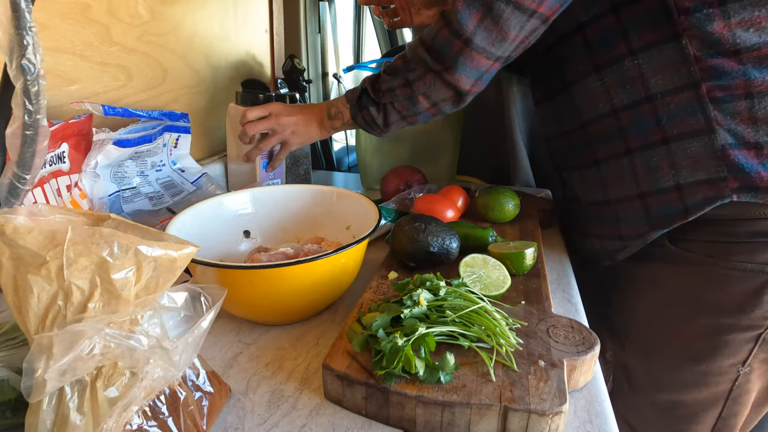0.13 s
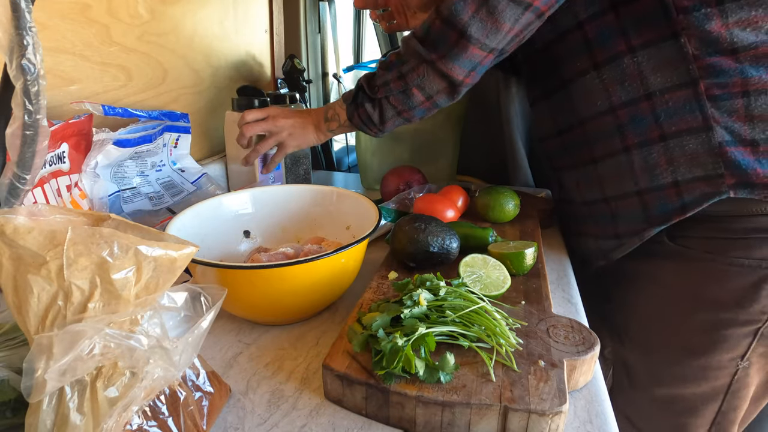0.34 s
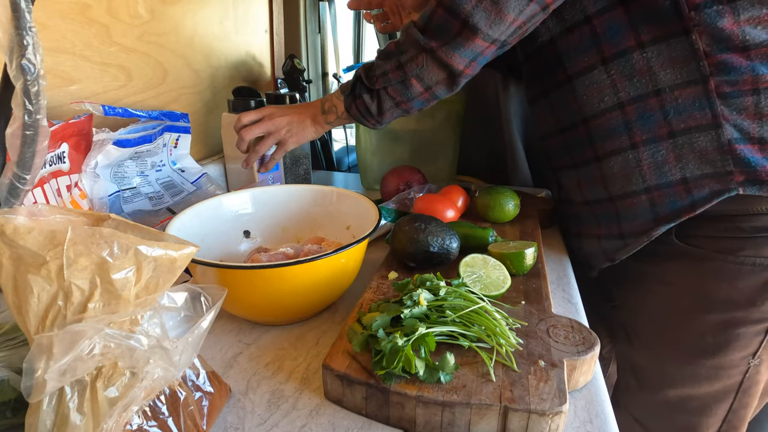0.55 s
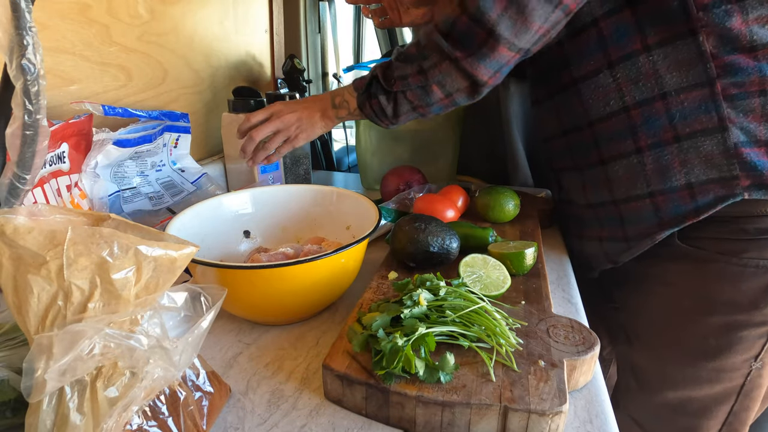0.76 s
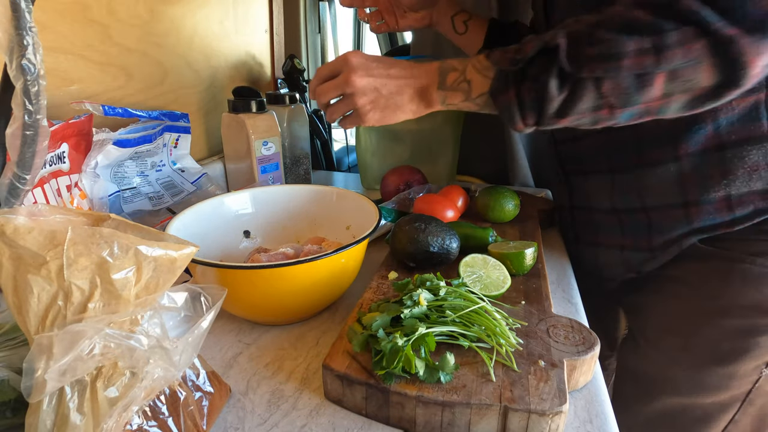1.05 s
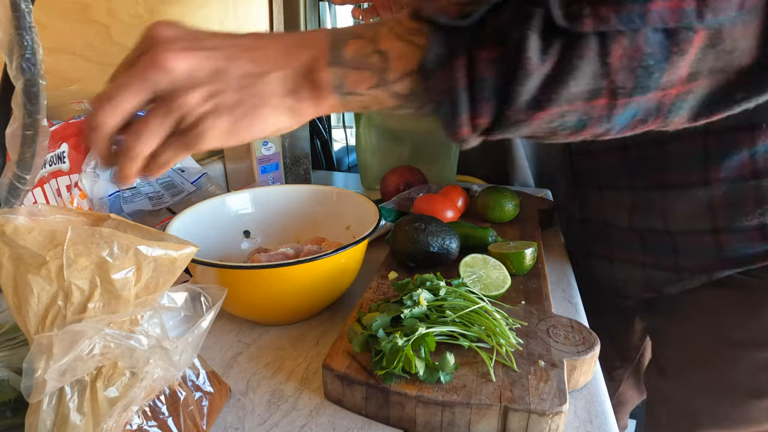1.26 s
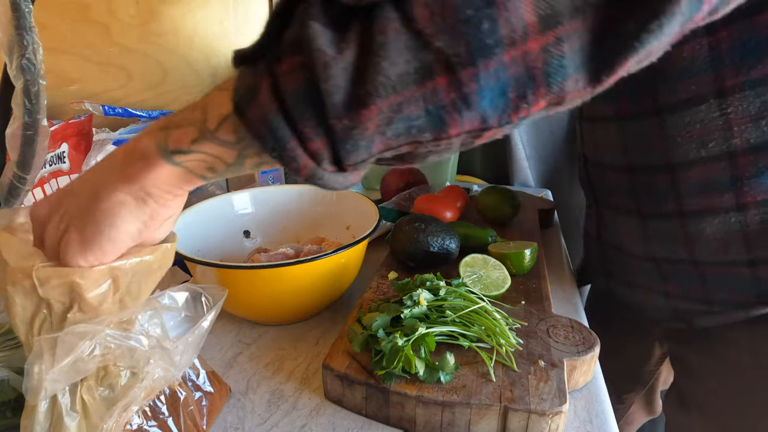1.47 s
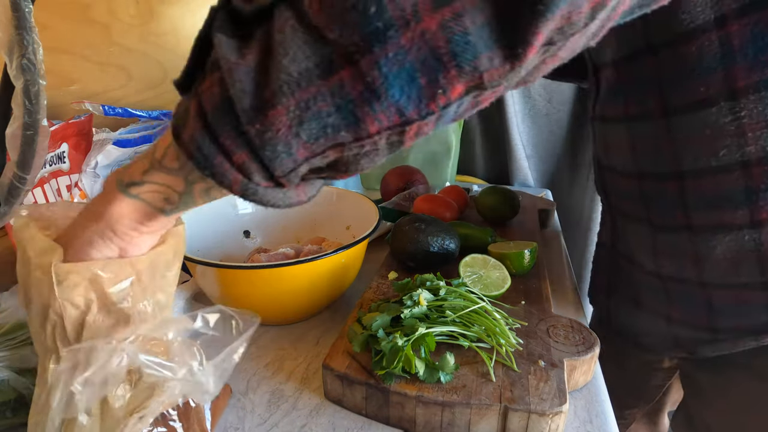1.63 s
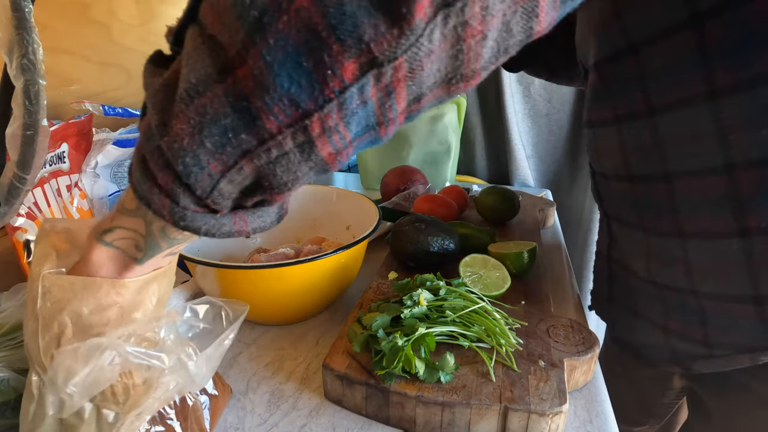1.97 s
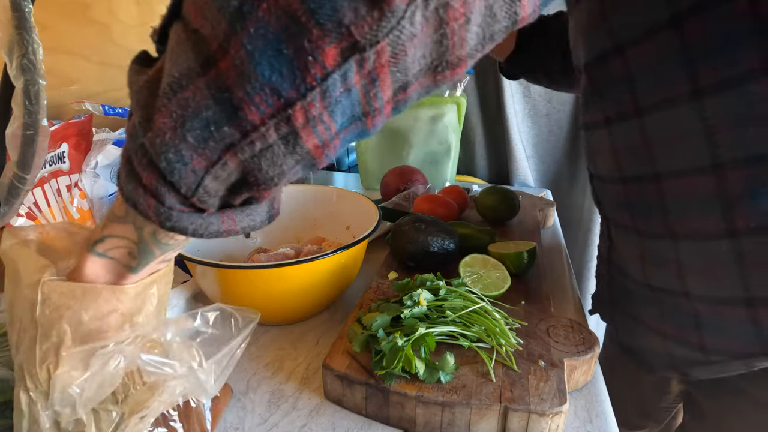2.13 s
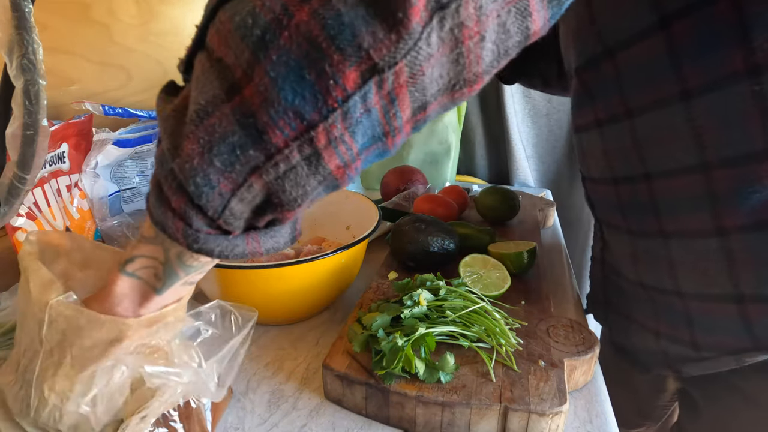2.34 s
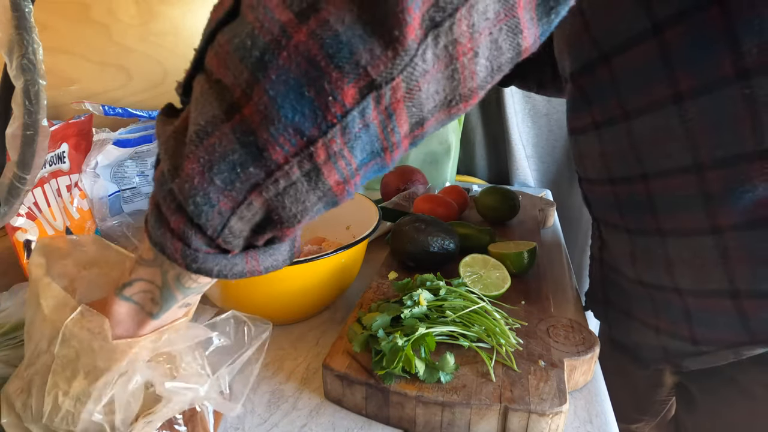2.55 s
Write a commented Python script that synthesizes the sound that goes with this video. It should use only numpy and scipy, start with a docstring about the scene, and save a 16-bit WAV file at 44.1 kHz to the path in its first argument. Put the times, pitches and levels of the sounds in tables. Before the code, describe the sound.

The main sound is a paper bag with a plastic liner crinkling close by. First, from 0.2 to 0.6 seconds, a carton lands on a hollow counter with a juddering low thump and light finger ticks. A soft bump follows near 1.2 seconds. From 1.4 seconds a hand rummages in the bag, slightly left, with sharp crackles, loudest from 1.7 to 2.4, easing by 2.7. Faint hiss lies underneath.

```python
"""First a carton is set down on a hollow kitchen counter. It judders as it sticks and slips, the counter
rings with a low thump, and fingers tick on the carton as they let go. From about 1.4 s a hand digs into
a paper bag with a plastic liner, close by and a little to the left: creases buckle in swarms of tiny
snaps and the panels flap. The small room answers briefly, and a faint hiss lies under it all."""
import sys
import numpy as np
from scipy import signal
from scipy.fft import rfft, irfft
from scipy.io import wavfile
from scipy.ndimage import uniform_filter1d

SR = 44100
rng = np.random.default_rng(int(sys.argv[2]) if len(sys.argv) > 2 else 0)


def wrap_up_sound(samples):
    """Save the sound to the file named by the first command line argument, as 16-bit audio."""
    columns = np.atleast_2d(samples).T
    # keep every value between -1 and 1, then stretch to whole-number steps
    tamed = np.clip(columns, -1, 1)
    steps = np.round(tamed * 32767).astype(np.int16)
    wavfile.write(sys.argv[1], SR, steps)


N = 119070
TIME = np.arange(N) / SR
HZ = np.fft.rfftfreq(4096, 1 / SR)
TOUCH_S = 1.409  # the hand meets the bag
WIDTH_DB = 3.5  # spread of the level difference between the ears

# how strongly the hand stirs each part of the bag: t/s, paper/dB, liner/dB, panels/dB
HAND_MOTION = [(1.405, -64, -63, -53), (1.418, -53, -48, -56), (1.459, -44, -39.5, -51.5),
               (1.478, -39.5, -32.5, -55), (1.523, -42, -38.5, -54), (1.705, -30, -31, -43.5),
               (1.725, -33.5, -34, -47.5), (1.815, -38, -37, -50), (1.877, -28, -32, -38.5),
               (1.941, -38.5, -38.5, -46.5), (1.963, -38.5, -45, -62), (1.981, -40, -41, -53),
               (2.017, -26, -32.5, -45), (2.027, -26.5, -30, -38), (2.063, -35, -34, -48.5),
               (2.089, -29.5, -31, -42), (2.099, -30.5, -32, -45), (2.161, -43.5, -43.5, -61.5),
               (2.187, -42, -48.5, -55), (2.201, -47, -44, -48.5), (2.215, -38, -46, -45),
               (2.223, -30.5, -37.5, -45), (2.238, -34.5, -38.5, -47.5), (2.258, -35.5, -40.5, -45),
               (2.287, -28.5, -33.5, -42.5), (2.301, -28, -29, -37), (2.333, -34.5, -36, -45),
               (2.367, -30, -31.5, -46.5), (2.385, -28, -31, -40), (2.435, -37.5, -40.5, -46.5),
               (2.449, -37, -44, -49), (2.51, -44, -44, -52.5), (2.589, -41, -39.5, -58),
               (2.615, -49.5, -44.5, -60), (2.661, -43.5, -44.5, -53.5), (2.7, -50.5, -42.5, -62)]
# where the counter is heard: f/Hz, left minus right/dB
COUNTER_BALANCE = [(30, -4.5), (100, -3), (160, -5), (250, -2), (450, 1.5)]


def bag():
    """A hand makes the paper crackle, the liner fizz, the panels flap and single creases snap."""
    # tone of the paper, the liner and the panels: f/Hz, level/dB
    paper = [(100, -47), (300, -36), (780, -19), (1050, -0.5), (1220, -7), (1520, 1), (1800, -4),
             (2200, -1), (2800, -2.5), (3500, -4.5), (5000, -17.5), (9000, -67)]
    liner = [(150, -61), (1500, -12), (3000, -8), (3800, -6), (4700, -3.5), (6200, -1.5), (7500, -3),
             (8700, -9), (10500, -12.5), (12200, -16), (13200, -24.5), (15200, -33)]
    panels = [(30, -16), (115, -11.5), (160, 1), (210, 1), (290, 4.5), (380, 3), (500, 4), (680, -0.5),
              (900, -7.5), (2500, -52)]
    # the loudest creases: t/s, level/dB, pitch/Hz, crack against ring/dB
    creases = [(1.411, -45.5, 1410, 0), (1.419, -29.5, 1510, -12), (1.44, -28, 7500, -7),
               (1.469, -22, 2080, -23), (1.604, -20.5, 2320, -23), (1.635, -16.5, 2490, -10.5),
               (1.679, -14, 5100, -6.5), (1.707, -13.5, 1420, -10), (1.711, -13, 5770, -13),
               (1.746, -20, 1390, -17), (1.835, -17, 1520, -23), (1.85, -24, 3500, -7),
               (1.867, -15, 1350, -2.5), (1.872, -18, 1800, 0), (1.877, -25, 2560, -5),
               (1.897, -21, 1560, 1), (1.953, -25, 1570, -1), (1.963, -25, 1540, 2.5),
               (2.014, -25, 1530, -11), (2.047, -19.5, 5930, -5), (2.083, -25, 177, -30),
               (2.085, -20, 970, -14), (2.096, -12, 2530, -13), (2.182, -20.5, 2600, -22),
               (2.193, -26, 3480, -23), (2.2023, -23.5, 650, -27), (2.2002, -20, 1430, -26),
               (2.205, -21, 1440, -14), (2.221, -19, 1510, -15), (2.229, -18.5, 1000, -4.5),
               (2.2604, -25.5, 1390, 2), (2.263, -18.5, 5970, -2), (2.277, -14, 6220, -4.5),
               (2.283, -19, 5700, -7), (2.296, -12, 1510, -10), (2.3025, -16.5, 1570, -5.5),
               (2.304, -23.5, 277, -32), (2.311, -21.5, 2170, -7), (2.378, -14.5, 2700, -14),
               (2.3875, -12.5, 2020, -22), (2.3919, -16.5, 2090, -13), (2.405, -14.5, 1840, -12),
               (2.411, -17.5, 1970, -6), (2.4166, -18, 5370, -3), (2.429, -17.5, 2730, -14),
               (2.4375, -21.5, 2198, -1), (2.455, -30.5, 5100, 0), (2.467, -23, 2690, -11),
               (2.529, -28, 2750, -25), (2.555, -23, 1400, -23), (2.561, -24, 1480, -21)]
    # tone of the room's answer: f/Hz, gain/dB
    room_tone = [(100, -4), (4000, 5), (7000, -17), (10000, 9), (13000, 25)]
    # where the bag is heard: f/Hz, left minus right/dB
    balance = [(100, 3), (300, -1), (700, 2), (2000, 4.5), (4500, 1.5), (7500, 3), (10000, 5.5), (14000, 7)]
    _, paper_db, liner_db, panel_db = np.transpose(HAND_MOTION)
    x = amp(-1.5) * swarm(paper_db, paper, per_s=950, spread_db=4.5, decay_s=0.001, rub_db=-1)
    x += swarm(liner_db, liner, per_s=1300, spread_db=3, decay_s=0.00054, rub_db=4)
    x += amp(0.6) * swarm(panel_db, panels, per_s=450, spread_db=1.2, decay_s=0.0021, rub_db=1)
    for start_s, *crease in creases:
        add(x, start_s, snap(*crease))
    reflections = amp(-8.5) * echoes(x)
    tail = amp(-19.5) * colour(room(x), read(room_tone, HZ))
    return panned(x + reflections + tail, balance)


def swarm(level_db, spectrum, per_s, spread_db, decay_s, rub_db):
    """Many small creases, no two alike, buckle at random over the noise of rubbing."""
    t, out = np.arange(1024) / SR, np.zeros((2, N))
    size = amp(spread_db * np.minimum(rng.exponential(1, N), 3.5))
    buckles = (rng.random(N) < per_s / SR) & (TIME > TOUCH_S)
    grit, rub = rng.standard_normal((2, N + len(t)))
    ears = amp(WIDTH_DB * rng.standard_normal(N) * np.array([[.5], [-.5]]))
    for i in np.flatnonzero(buckles):
        click = evened(grit[i:i + len(t)] * np.exp(-t / decay_s))
        add(out, i / SR, size[i] * ears[:, i, None] * click)
    out = crumple(evened(out) + amp(rub_db) * rub[:N])
    out = colour(out, read(spectrum, HZ))
    # flatten the loudness, then let the hand shape it
    out /= np.sqrt(uniform_filter1d((out ** 2).mean(0), size=1100) + 1e-12)
    fade_in = np.clip((TIME - TOUCH_S) / 0.014, 0, 1)
    return out * fade_in * amp(np.interp(TIME, np.transpose(HAND_MOTION)[0], level_db))


def crumple(x, depth_db=2, patch_hz=500, patch_s=.04):
    """The crumpling sheet keeps changing shape, so its tone shifts in patches."""
    spectra = signal.stft(x, nperseg=256)[2]
    patches = rng.standard_normal(spectra.shape[1:])
    patches = uniform_filter1d(patches, round(patch_hz * 256 / SR), axis=0)
    patches = uniform_filter1d(patches, round(patch_s * SR / 128), axis=1)
    return signal.istft(spectra * amp(depth_db * evened(patches)))[1][:, :N]


def snap(level_db, hz, crack_db, crack_s=0.0019, ring_s=0.0016, rise_s=0.00036, slacken_s=0.0035):
    """A large crease gives way: a click, a crack and a short ring that falls as the paper slackens."""
    t = np.arange(2048) / SR
    burst = rng.standard_normal(len(t)) * np.exp(-t / crack_s)
    # a sharp click about half a millisecond into the crack's noise
    burst[round(0.00055 * SR)] += amp(5.5)
    crack = colour(burst, unit_power(crack_tone()))
    pitch = hz * (1 + .07 * (np.exp(-t / slacken_s) - .5))
    phase = 2 * np.pi * np.cumsum(pitch) / SR
    ring = np.sin(phase) + amp(-12) * np.sin(1.42 * phase)
    ring *= np.exp(-t / ring_s * (hz / 1000) ** 0.24)  # lower creases ring longer
    sound = (ring + amp(crack_db) * crack) * (1 - np.exp(-t / rise_s))
    bass_cut = signal.butter(4, 165, "highpass", fs=SR, output="sos")
    return place(amp(level_db) * signal.sosfilt(bass_cut, sound))


def crack_tone():
    """A crack spreads widely over low and high pitches."""
    # tone of a crack: f/Hz, level/dB
    tone = [(50, -27), (130, -8), (300, -8), (500, -5), (800, -5), (1500, 1), (4000, -2.5), (7000, 2),
            (9000, -11), (12000, -13.5), (15500, -34)]
    return read(tone, HZ)


def echoes(x, count=14, shapes=16, nearest_s=.0008, span_s=.009):
    """Sound bounces off the bag walls and the counter; the echoes shift as the bag changes shape."""
    out = np.zeros_like(x)
    shape = np.interp(TIME, [TOUCH_S, TIME[-1]], [0, shapes - 1])
    for i in range(shapes):
        blend = np.cos(np.pi / 2 * np.clip(shape - i, -1, 1))
        part = x * blend / np.sqrt(count)
        for k, share in enumerate(rng.random(count)):
            add(out, nearest_s + span_s * share ** 2, (-1) ** k * part)
    return out


def counter():
    """Each blow pushes the hollow counter and makes it ring; longer contact gives a duller thud."""
    # blows on the counter: t/s, level/dB, contact time/s
    blows = [(0.197, -54, 0.00075), (.232, -27, 0.0045), (0.2531, -34, 0.0045), (0.2803, -19.5, 0.0029),
             (.297, -18.5, 0.0029), (0.308, -13.5, 0.0048), (0.33, -21.5, 0.0044), (.382, -24, 0.0053),
             (0.441, -33, 0.021), (0.516, -38, 0.0042), (.546, -34.5, 0.0062), (0.574, -48, 0.0038),
             (1.239, -33, 0.017), (1.261, -33.5, 0.0095), (1.319, -30.5, 0.016), (1.37, -34, 0.055),
             (1.417, -46, 0.0081), (1.586, -43, 0.015)]
    # the counter's own notes: f/Hz, level/dB, time to fade by 60 dB/s
    notes = [(28.1, -34, 0.38), (57, -26, 0.21), (84, -8.5, 0.084), (99.6, -14.5, 0.46),
             (119.2, -29.5, 0.41), (155, -1, 0.15), (165, -20.5, 0.97), (183, -33, 0.16), (235, -17, 0.14),
             (248, -10, 0.16), (319, -8, 0.27), (466, -21, 0.069)]
    t, force, push = np.arange(SR) / SR, np.zeros(N), np.zeros(N)
    for hit_s, db, contact_s in blows:
        pulse = amp(db) * np.exp(-(2 * (TIME - hit_s) / contact_s) ** 2)
        push += pulse
        force += pulse / (contact_s * SR / 2)
    ring = sum(amp(db - 60 * t / fade_s) * np.cos(2 * np.pi * hz * t) for hz, db, fade_s in notes)
    x = signal.fftconvolve(force, ring)[:N] + amp(1) * push
    x = signal.sosfilt(signal.butter(2, 18, "highpass", fs=SR, output="sos"), x)
    return panned(x + amp(-14.5) * room(x), COUNTER_BALANCE)


def skids(unsteadiness=0.076, roughness=0.033):
    """A dragged surface sticks and slips; its judder glides as the drag speeds up or slows."""
    # drags: t/s, length/s, level/dB, first rate/Hz, last rate/Hz
    drags = [(.195, 0.09, -23, 164.8, 146.6), (.272, 0.054, -18.5, 182.2, 161),
             (.335, 0.059, -32, 160.5, 156), (1.217, 0.037, -46.5, 263, 138),
             (1.435, 0.028, -44.5, 232, 317)]
    x = np.zeros((2, N))
    for start_s, length_s, db, first_hz, last_hz in drags:
        progress = np.clip((TIME - start_s) / length_s, 0, 1)
        waver, grit = (evened(uniform_filter1d(rng.standard_normal(N), size=n)) for n in (300, 40))
        rate = (first_hz + (last_hz - first_hz) * progress) * (1 + unsteadiness * waver)
        slips = np.cumsum(rate * (progress > 0)) / SR
        grip = np.sin(np.pi * progress ** 0.81)  # peaks a little early
        x += amp(db) * grip * (np.sin(2 * np.pi * slips) + roughness * grit)
    return panned(x, COUNTER_BALANCE)


def carton():
    """Dry taps and finger ticks on the carton, each strongest around one pitch; the cap rings on."""
    # taps: t/s, level/dB, decay/s, tilt above 2 kHz/(dB per octave), pitch/Hz, boost there/dB
    taps = [(.194, -41.5, 0.016, -7, 414, 16.5), (0.214, -46, 0.016, -2, 1190, 9),
            (.245, -42, 0.02, -2, 1100, 6), (0.2717, -29, 0.0078, -2.5, 820, 10),
            (.28, -45, 0.016, -5.5, 290, 27), (0.408, -50, 0.006, 3, 3800, 16),
            (0.4422, -40, 0.0047, -0.5, 3020, 4), (.495, -37.5, 0.0065, 2.5, 12200, 15.5),
            (0.752, -53, 0.0053, -0.5, 960, 6.5), (0.834, -69, 0.0065, 2, 8040, 11),
            (1.21, -54.5, 0.015, -5.5, 300, 20), (1.233, -52, 0.018, -1.5, 223, 27.5)]
    # tone of the carton: f/Hz, level/dB
    tone = [(100, -3), (300, -8.5), (480, 2.5), (660, 5), (830, -7.5), (1150, 1.5), (1600, -4.5),
            (3000, -5), (5000, -14), (7500, -10.5), (11500, -23), (15500, -36)]
    # notes of the carton and its cap: f/Hz, level/dB, time to fade by 60 dB/s
    notes = [(1112, -36.5, 0.087), (1430, -43, 0.092), (2860, -30, 0.064), (7741, -36, .06)]
    t, x = np.arange(SR // 4) / SR, np.zeros((2, N))
    treble_octaves = np.log2(np.maximum(HZ / 2000, 1))
    for start_s, db, decay_s, tilt_db, hz, boost_db in taps:
        bump = np.exp(-(np.log2((HZ + 1) / hz) / 0.42) ** 2)  # about 0.42 octaves to each side
        tone_db = read(tone, HZ) + tilt_db * treble_octaves + boost_db * bump
        envelope = np.exp(-t / decay_s) * (1 - np.exp(-t / (0.054 * decay_s)))
        tap = colour(rng.standard_normal(len(t)) * envelope, unit_power(tone_db))
        add(x, start_s, place(amp(db + 1.5) * tap))
    ring = sum(amp(db - 60 * t / fade_s) * np.sin(2 * np.pi * hz * t) for hz, db, fade_s in notes)
    x += amp(-14.5) * signal.fftconvolve(x, ring[None], axes=1)[:, :N]
    return (x + amp(-9.5) * room(x)) * amp([[1], [-1]])  # slightly to the left


def room(x):
    """The small room's echoes blur into a short tail, different at each ear."""
    # how long the room rings: f/Hz, time to fade by 60 dB/s
    fade_times = [(100, 0.2), (300, 0.079), (1500, 0.099), (6000, 0.11), (15000, 0.039)]
    hz, t, spectra = signal.stft(rng.standard_normal((2, SR // 2)), SR, nperseg=256)
    tail = signal.istft(spectra * amp(-60 * t / read(fade_times, hz)[:, None]), SR)[1]
    tail[:, :SR // 300] = 0  # gap before the first echo
    return signal.fftconvolve(np.atleast_2d(x), tail / np.linalg.norm(tail[0]), axes=1)[:, :N]


def background():
    """Two quiet noises, low air and a brighter hiss, drift in level."""
    # tone of each noise: f/Hz, level/dB
    air_tone = [(22, -5), (50, -16), (85, -20), (120, -37), (168, -19), (215, -25.5), (350, -33.5),
                (510, -27.5), (740, -36), (1050, -34), (1500, -33.5), (2600, -45), (4000, -46.5),
                (5200, -53.5), (7000, -47.5), (9500, -59), (11700, -46.5), (15400, -86)]
    hiss_tone = [(200, 2), (600, -4), (1500, 0), (2500, -8.5), (3500, -5.5), (5000, -18.5), (7200, -7),
                 (9000, -15.5), (11500, -10.5), (14000, -28)]
    # loudness of each noise: t/s, level/dB
    air_level = [(0, -63), (.25, -68), (.4, -52.5), (.63, -55), (0.821, -61), (1.04, -56), (1.18, -59),
                 (2.7, -65)]
    hiss_level = [(0, -65.5), (.17, -63), (0.259, -53.5), (.34, -63.5), (.6, -79), (.75, -78.5), (2.7, -69)]
    x = np.zeros((2, N))
    for tone, level, width in (air_tone, air_level, 0.88), (hiss_tone, hiss_level, 0.83):
        noise = rng.standard_normal(N) + width * rng.standard_normal((2, N))
        x += evened(colour(noise, read(tone, HZ))) * amp(np.interp(TIME, *np.transpose(level)))
    return x


def place(sound, lag_spread_s=.000011):
    """Gives a sound a random spot: a small level and time difference between the ears."""
    pan, lag = rng.standard_normal(2)
    side, hz = np.array([[.5], [-.5]]), np.fft.rfftfreq(len(sound), 1 / SR)
    delay = np.exp(2j * np.pi * hz * side * lag * lag_spread_s)
    return irfft(rfft(sound) * amp(side * pan * WIDTH_DB) * delay, len(sound))


def panned(x, balance):
    """Leans each frequency to the left or right."""
    pan_db = read(balance, HZ)
    return np.array([colour(x[0], pan_db / 2), colour(x[1], -pan_db / 2)])


def colour(x, curve_db):
    """Turns the frequencies HZ up or down by a curve, with no ringing ahead of the sound."""
    log_gain = np.log(amp(np.r_[curve_db, curve_db[-2:0:-1]]))
    taps = np.fft.ifft(np.exp(np.conj(signal.hilbert(log_gain)))).real[:len(HZ)]
    return np.apply_along_axis(lambda v: signal.fftconvolve(v, taps)[:len(v)], -1, x)


def unit_power(curve_db):
    """Shifts a curve so that it leaves the level of white noise alone."""
    return curve_db - 10 * np.log10(np.mean(amp(curve_db) ** 2))


def amp(db):
    """Turns decibels into a gain."""
    return 10 ** (np.asarray(db) / 20)


def evened(x):
    """Scales a signal to an average power of 1."""
    return x / np.sqrt(np.mean(x ** 2) + 1e-20)


def read(points, hz):
    """Looks up a table between its frequencies."""
    f, value = np.transpose(points)
    return np.interp(np.log(hz + 1), np.log(f), value)


def add(mix, start_s, sound):
    """Mixes a sound in at the given time."""
    part = mix[..., round(start_s * SR):][..., :sound.shape[-1]]
    part += sound[..., :part.shape[-1]]


def scene():
    """All the sources together, in stereo."""
    return bag() + counter() + skids() + carton() + background()


def record(dry):
    """Cuts the treble above 15.4 kHz."""
    treble_cut = signal.firwin(401, 15400, window=("kaiser", 9), fs=SR)
    return signal.oaconvolve(dry, treble_cut[None], "same")


dry = scene()
out = record(dry)
wrap_up_sound(out)
```